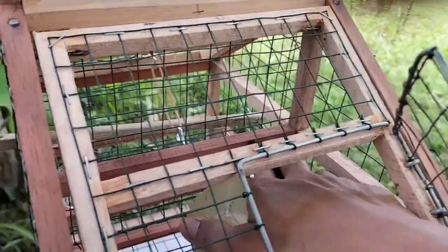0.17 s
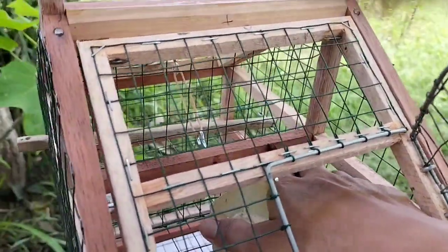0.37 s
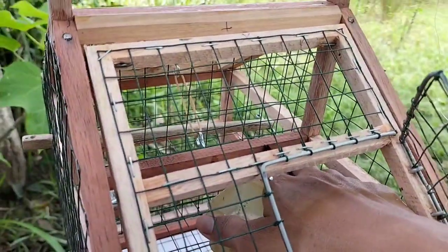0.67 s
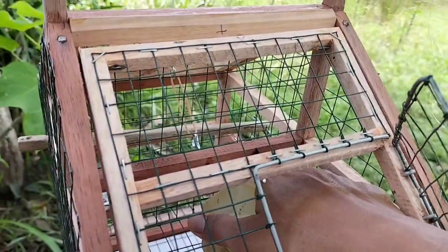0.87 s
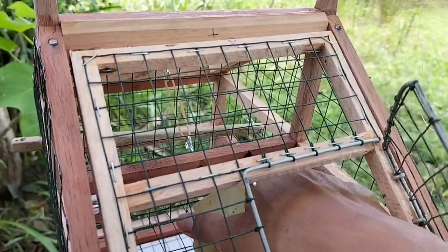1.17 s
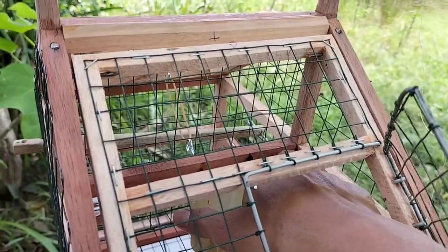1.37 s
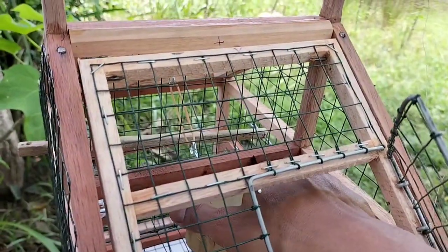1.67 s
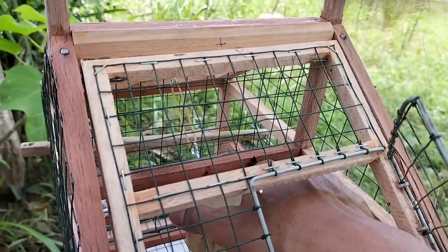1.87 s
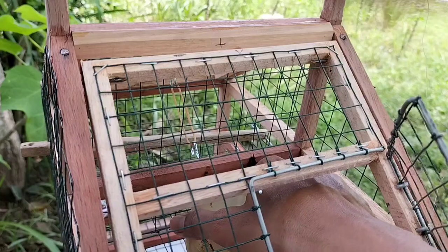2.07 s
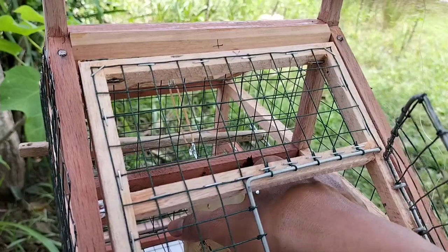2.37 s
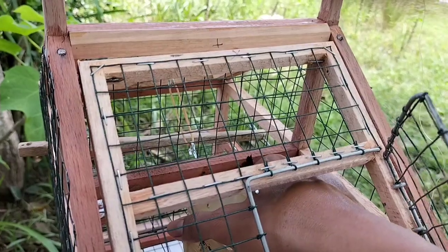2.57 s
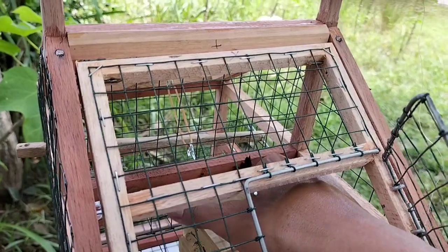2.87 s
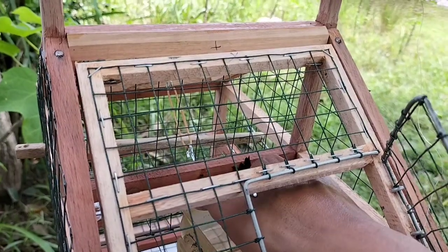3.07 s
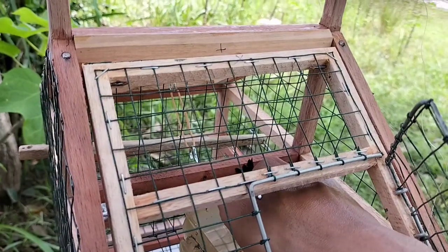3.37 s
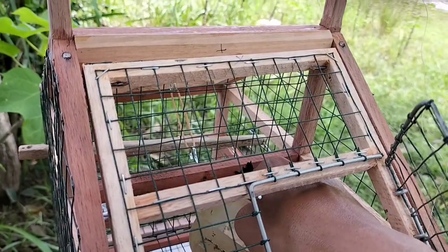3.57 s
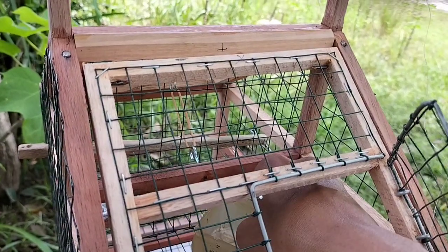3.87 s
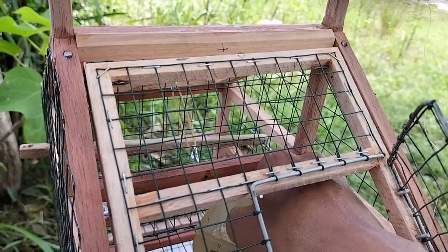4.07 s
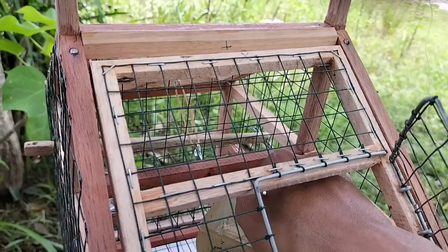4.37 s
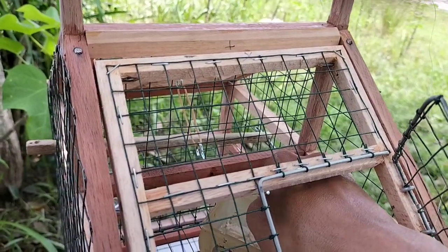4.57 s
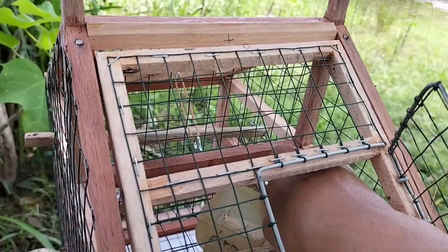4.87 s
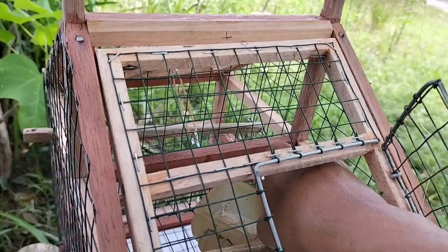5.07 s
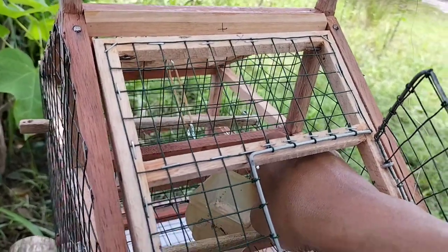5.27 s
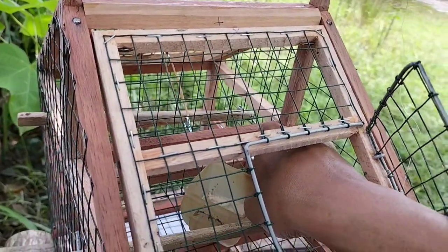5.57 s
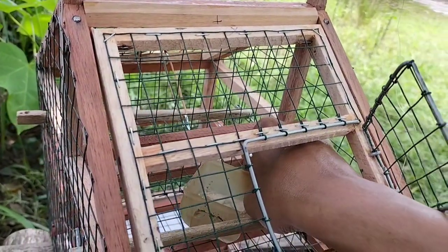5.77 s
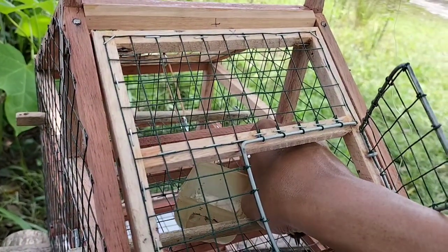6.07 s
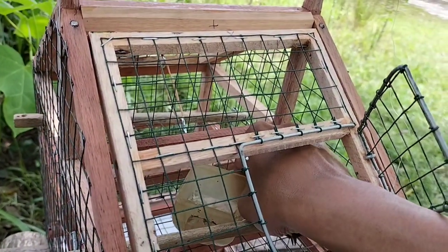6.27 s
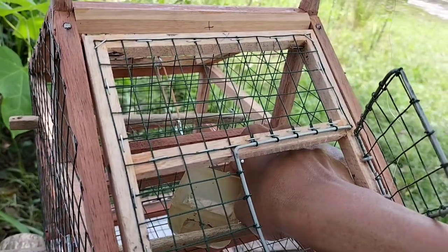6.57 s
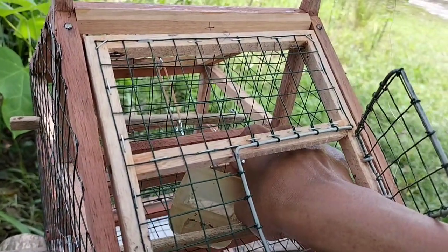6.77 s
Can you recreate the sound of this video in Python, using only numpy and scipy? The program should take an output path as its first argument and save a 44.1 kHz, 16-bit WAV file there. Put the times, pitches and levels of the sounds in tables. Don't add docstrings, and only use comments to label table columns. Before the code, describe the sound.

Close, nearly dry sound beside a wood and wire trap among trees. Faint hiss, thin insect bands and a low distant engine throb throughout. Four bright chirps come early, with thin far whistles afterwards. Soft feather rustles and wire ticks lead to a knock on the frame and a brief mesh ring. Three harsh bird screams follow, each breaking downward in pitch at its end.

```python
import sys
import numpy as np
from scipy import signal
from scipy.fft import rfft, irfft, next_fast_len
from scipy.io import wavfile
from scipy.ndimage import uniform_filter1d, map_coordinates

SR = 44100
rng = np.random.default_rng(int(sys.argv[2]) if len(sys.argv) > 2 else 0)


def int16_out(signal):
    q = np.round(np.clip(np.atleast_2d(signal).T, -1, 1) * 32767)
    wavfile.write(sys.argv[1], SR, q.astype(np.int16))


def invert_db(x):
    u = np.asarray(x, float) / 20
    return 10 ** u


N = 305172


def unit(x):
    return x / np.sqrt(np.mean(x ** 2) + 1e-20)


def along(points, hz):
    f, v = np.transpose(points)
    return np.interp(np.log(hz + 1), np.log(f + 1), v)


def curves(rows, start=0, count=N):
    s, *cols = np.transpose(rows)
    t = (start + np.arange(count)) / SR
    return [np.interp(t, s, c) for c in cols]


def wobble(rate, count=N):
    knots = rng.standard_normal(count // 20 + 8)
    return map_coordinates(knots, [np.arange(count) * rate / SR])


def filtered(x, gain):
    m = next_fast_len(len(x) + 4096)
    return irfft(rfft(x, m) * gain(np.fft.rfftfreq(m, 1 / SR)), m)[:len(x)]


def coloured(gain, count=N):
    return unit(filtered(rng.standard_normal(count), gain))


def tone(hz):
    return np.sin(2 * np.pi * np.cumsum(hz) / SR)


def add(x, s, part):
    i = round(s * SR)
    x[i:i + len(part)] += part[:len(x) - i]


def fade(count, edge_s):
    n = np.arange(count)
    return np.clip(np.minimum(n, count - n) / (edge_s * SR), 0, 1)


# f/Hz, t60/s
REVERBERATION = [(1000, 0.15), (4000, 0.74), (8000, 0.65)]


def trees(x, stretch):
    hz, t, z = signal.stft(rng.standard_normal(SR), SR, nperseg=256)
    t60 = stretch * along(REVERBERATION, hz)[:, None]
    tail = signal.istft(z * invert_db(-60 * t / t60), SR, nperseg=256)[1]
    delayed = np.pad(x, (150, 0))
    return signal.fftconvolve(delayed, tail / np.linalg.norm(tail))[:len(x)]


# f/Hz, density/dB
HISS_SPECTRUM = [(15, -34.5), (25, -11.5), (75, -11), (122, -6), (151, -4), (259, -10.5), (410, -19.5),
                 (1020, -17), (1270, -20), (1800, -28), (3920, -28), (4610, -34.5), (7080, -36.5),
                 (9020, -51), (15400, -59.5)]


def field_hiss():
    level_db = -72.5 - 0.36 * np.arange(N) / SR
    return invert_db(level_db + 6.5 + 0.89 * wobble(27.0)) * coloured(lambda f: invert_db(along(HISS_SPECTRUM, f)))


# f/Hz, width/Hz, level/dB
INSECT_BANDS = [(4050, 220, -88.5), (7200, 59, -95.5)]


def insects():
    x = np.zeros(N)
    for hz, width, db in INSECT_BANDS:
        band = coloured(lambda f: 1 / (1 + ((f - hz) / width) ** 2))
        x += invert_db(db + 2 * wobble(6)) * band
    return x


# order, level/dB
FIRING_ORDERS = [(2, -19.5), (4, -2), (5, 0.5), (6, -4.5), (8, -10.5), (9, -14), (10, -17.5), (12, -21.5)]
# t/s, level/dB
ENGINE_SWELL = [(0.0, -60), (0.44, -61), (1.17, -57.5), (1.46, -62.5), (1.56, -61), (2.68, -65),
                (2.76, -65), (3.1, -61.5), (3.68, -66.5), (3.8, -60), (4.07, -67.5), (4.15, -65.5),
                (4.55, -64.5), (4.66, -67), (5.0, -73), (5.43, -61), (5.82, -66), (6.92, -64)]


def engine():
    firing_hz = 30.07
    level_db, = curves(ENGINE_SWELL)
    shaft = 2 * np.pi * np.cumsum(firing_hz * (1 + 0.00596 * wobble(2.2))) / SR
    thud = np.zeros(N)
    for order, db in FIRING_ORDERS:
        thud += invert_db(db + 2.3 * wobble(4.17)) * np.sin(order * shaft + 0.76 * wobble(2.545))
    return invert_db(level_db - 1.0) * unit(thud)


# start t/s, length/s, from f/Hz, to f/Hz, level/dB
WHISTLE_GLIDES = [
    (1.662, 0.032, 6530, 5650, -69.5),
    (1.7, 0.026, 4660, 4050, -69),
    (1.736, 0.02, 4050, 3860, -72),
    (1.86, 0.24, 6650, 7200, -70.5),
    (1.975, 0.038, 7300, 7600, -67),
    (2.79, 0.038, 7230, 6460, -67.5),
    (2.804, 0.068, 7300, 6970, -82),
    (4.372, 0.026, 7430, 6780, -67.5),
    (4.435, .07, 7300, 6800, -90),
    (4.91, 0.042, 7200, 6530, -64),
]


def whistles():
    x = np.zeros(N)
    for s, length, from_hz, to_hz, db in WHISTLE_GLIDES:
        n = round(length * SR)
        hz = np.linspace(from_hz, to_hz, n) + 70 * wobble(120, count=n)
        add(x, s, invert_db(db + wobble(83, count=n)) * fade(n, 0.0074) * tone(hz))
    return x


# t/s, f/Hz, level/dB
CHIRP_SHAPE = [
    (0, 4100, -22),
    (.006, 3900, -32),
    (.012, 3950, -8),
    (.022, 4450, -17),
    (.035, 4940, 0.1),
    (.047, 5200, -14),
    (.057, 5560, -1),
    (.067, 5640, -26),
]
# t/s, level/dB, pitch factor
CHIRP_TIMES = [
    (0.582, -35.5, 1.024),
    (.692, -36, 1.005),
    (0.81, -34, 1.005),
    (.928, -33.5, 1.012),
]


def chirps():
    x, n = np.zeros(N), round(CHIRP_SHAPE[-1][0] * SR)
    hz, shape_db = curves(CHIRP_SHAPE, count=n)
    puff_swell = np.exp(-((np.arange(n) / SR - .012) / 0.0076) ** 2)
    for s, db, factor in CHIRP_TIMES:
        size = invert_db(db + uniform_filter1d(shape_db, size=130) + 1.7 * wobble(68, count=n))
        whistle = size * tone(factor * hz)
        puff = coloured(lambda f: np.exp(-((f - 6800) / 1300) ** 2), count=n)
        puff = invert_db(db - 34.5) * puff * puff_swell
        note = np.pad(fade(n, 0.00061) * (whistle + puff), (0, SR // 2))
        add(x, s, note + invert_db(-6) * trees(note, stretch=.35) + invert_db(-14) * trees(note, stretch=.8))
    return x


# f/Hz, density/dB
FEATHER_SPECTRUM = [(710, -35), (1200, 0), (2060, -25), (2340, 10), (3880, 2.5), (6580, -12.5), (7080, -6),
                    (9520, -22), (15000, -24)]
# t/s, peak level/dB, centre f/Hz, decay/s
TICK_TIMES = [(1.503, -57, 5500, 0.011), (1.573, -64, 7000, 0.0082), (2.0994, -61, 7300, 0.0074),
              (2.4274, -79, 5140, 0.006), (2.687, -60, 5840, 0.0084), (2.7374, -60, 5960, 0.0092),
              (2.8937, -57, 7000, 0.015), (3.0064, -63.5, 5010, 0.011), (3.6945, -59, 6750, 0.014),
              (3.7782, -56, 6200, 0.016), (4.029, -60, 7200, 0.007)]


def ticks():
    x, t = np.zeros(N), np.arange(SR // 20) / SR
    for s, db, hz, decay in TICK_TIMES:
        def contact(f):
            centred = 0.3 + 1 / (1 + ((f - hz) / 900) ** 2)
            return invert_db(along(FEATHER_SPECTRUM, f)) * centred / (1 + (3500 / (f + 1)) ** 4)
        burst = coloured(contact, count=len(t))
        add(x, s, invert_db(db - 3) * burst * (1 - np.exp(-t / .0008)) * np.exp(-t / decay))
    return x


# f/Hz, level/dB
FRICTION_BANDS = [(2600, -9), (3700, -5), (5300, -5), (6800, -6), (13200, -17)]
# start t/s, length/s, level/dB, centre f/Hz
STROKES = [(0.985, 0.144, -65, 3600), (1.005, 0.063, -57, 7200), (1.49, 0.17, -63.5, 5500),
           (1.602, 0.22, -71.5, 4760), (2.088, 0.177, -69.5, 4900), (2.404, 0.05, -64.5, 4870),
           (2.808, 0.32, -73.5, 4400), (3.327, 0.1, -70.5, 6540), (3.456, 0.55, -78, 2980),
           (3.63, 0.064, -55, 3000), (3.728, 0.21, -63, 5270), (4.639, 0.16, -67.5, 4770)]


def rustles():
    x = np.zeros(N)
    for s, length, db, hz in STROKES:
        n = round(length * SR)
        stroke = fade(n, .02) * invert_db(-10 * np.arange(n) / n)
        for band_hz, band_db in FRICTION_BANDS:
            near = invert_db(band_db) * (.5 + 1 / (1 + ((band_hz - hz) / 1500) ** 2))
            grains = coloured(lambda f: np.exp(-(np.log2((f + 1) / band_hz) / .2) ** 2), count=n)
            clumps_db = 3.6 * wobble(252.5, count=n) + 3.1 * wobble(42.6, count=n)
            add(x, s, invert_db(db - 5.5 + clumps_db) * stroke * near * grains)
    return x


# f/Hz, width/Hz, level/dB
FRAME_MODES = [(390, 49, -13.5), (411, 49, -12), (710, 37, -4.5), (744, 36, -1), (1000, 128, 2),
               (1270, 410, 2), (2300, 920, -1), (2750, 210, 11.5)]
# t/s, peak level/dB, hardness/dB per octave
BLOWS = [
    (0.936, -53, -16),
    (2.549, -75, -7),
    (3.64, -48.5, -14),
    (3.657, -37, -6),
    (3.67, -43, -11.5),
    (4.615, -63, -16),
    (6.87, -63, -26.5),
]


def knocks():
    x, t = np.zeros(N), np.arange(SR // 5) / SR
    for s, db, hardness_db in BLOWS:
        def frame(f):
            response = 0
            for k, (hz, width, level) in enumerate(FRAME_MODES):
                gain = (-1) ** k * invert_db(level + hardness_db * np.log2(hz / 1000))
                response = response + gain * 1j * f * width / (hz * hz - f * f + 1j * f * width)
            return response / (1 + 1j * f / 2600) ** 3
        blow = rng.standard_normal(len(t)) * invert_db(-60 * t / .028) * (1 - np.exp(-t / .0005))
        knock = filtered(blow, frame)
        add(x, s, invert_db(db) * knock / np.abs(knock).max())
    return x


# f/Hz, level/dB, time to fall by 90 dB/s
MESH_MODES = [(2420, -3, 0.12), (2733, 13, 0.08), (3850, 2.5, 0.081), (4660, -12, 0.06), (4830, -2, 0.096),
              (5500, 4, 0.04), (5860, 5, 0.033), (7840, -18, 0.04)]
# t/s, peak level/dB
MESH_RELEASE = [
    (4.6165, -41),
]


def snap():
    x, t = np.zeros(N), np.arange(SR // 4) / SR
    for s, db in MESH_RELEASE:
        ring = sum(invert_db(level - 5.0 - 90 * t / t60) * np.sin(2 * np.pi * hz * t)
                   for hz, level, t60 in MESH_MODES)
        crack = coloured(lambda f: 1 / (1 + (2500 / (f + 1)) ** 4) / (1 + (f / 8000) ** 8), count=len(t))
        crack = invert_db(-9 - 60 * t / .035) * crack
        add(x, s, invert_db(db) * (ring + crack) * (1 - np.exp(-t / .0004)))
    return x


# f/Hz, level/dB
LOWER_THROAT = [(1500, -17.5), (2300, -17.5), (3200, -6), (3800, 1.3), (4600, 2.2), (5200, 5), (6200, 0),
                (7100, -9)]
# f/Hz, level/dB
UPPER_THROAT = [(2940, -38), (5000, -16), (6270, -6), (7260, 0.5), (8360, -30.5), (9410, -51), (12000, -39),
                (15400, -33)]


def harmonics(glide, hz, phase, tone_db, second_db, open_db, bright):
    n = len(hz)
    lowest_db = -7 * np.clip(1 - 8 * bright, 0, 1)
    levels = [tone_db + along(LOWER_THROAT, k * glide) + db
              for k, db in ((1, lowest_db), (2, second_db), (3, open_db))]
    levels += [tone_db + 6 + open_db - 3 + along(UPPER_THROAT, k * hz) for k in range(4, 10)]
    unsettled = 1.3 * np.exp(-np.arange(n) / (.04 * SR)) * wobble(600, count=n)
    voice = np.zeros(n)
    for k, db in enumerate(levels):
        flicker = invert_db((1.5 + .4 * k) * wobble(140, count=n))
        shiver = (.03 * k * k + .04 * k) * wobble(500, count=n) + (k + 1) * unsettled
        voice += invert_db(db + 2.5) * flicker * np.sin((k + 1) * phase + shiver)
    return voice


def half_pitch_lines(phase):
    return sum(invert_db(db + 4.1 * wobble(37.5, count=len(phase))) * np.sin((k + .5) * phase)
               for k, db in enumerate([-12, 5, 7.5, -17.5]))


# f/Hz, density/dB
RASP_SPECTRUM = [(600, -40.5), (1000, -32.5), (1500, -24), (2000, -21), (2500, -10), (3100, -8.5),
                 (3700, -0.5), (4800, 2.1), (5900, -0.5), (7000, 3.5), (8400, -26.5), (9400, -60.5),
                 (11900, -26), (15400, -36)]
# f/Hz, width/Hz, level/dB
MOUTH_RESONANCES = [(3750, 150, 6), (4950, 120, 4), (5900, 150, 6)]


def chaotic_rasp(phase, bright):
    n = len(phase)
    beat = sum(invert_db(1.5 * wobble(60, count=n)) * tone(f * (1 + .1 * wobble(50, count=n)))
               for f in (300, 580, 870))
    skirts = np.zeros(n)
    for k in range(1, 9):
        noise = coloured(lambda f: .25 + 1 / (1 + (f / 400) ** 2), count=n)
        chaos = (.9 * beat + noise) * invert_db(2.5 * wobble(70, count=n))
        skirts += chaos * np.sin(k * phase + rng.uniform(0, 2 * np.pi))

    def tilted(tilt_db):
        return unit(filtered(skirts, lambda f: invert_db(along(RASP_SPECTRUM, f)
                                                   + tilt_db * np.log2(f / 5000 + .1))))

    def mouth(f):
        return invert_db(sum(db / (1 + ((f - hz) / width) ** 2) for hz, width, db in MOUTH_RESONANCES))

    share = np.clip(bright, 0, 1)
    mixed = (1 - share) * tilted(-6) + share * tilted(6)
    return filtered(mixed, mouth) * invert_db(1.4 * wobble(90, count=n))


# t/s, f/Hz
SCREAM_PITCH = [
    [(4.995, 1845), (5.04, 1974), (5.085, 1824), (5.145, 1851), (5.208, 1954), (5.3, 1891), (5.362, 1790),
     (5.42, 1650), (5.515, 1590)],
    [(5.692, 2300), (5.725, 2268), (5.785, 2380), (5.86, 2256), (5.965, 2174), (5.985, 2072), (6.075, 2040),
     (6.12, 1994), (6.172, 1902)],
    [(6.422, 2403), (6.505, 2310), (6.56, 2373), (6.61, 2386), (6.665, 2283), (6.75, 2169), (6.8, 2124),
     (6.835, 1961), (6.905, 1808)],
]
# t/s, effort level/dB, tone over rasp level/dB, beak opening/0-1
SCREAM_PUSH = [
    [(4.995, -47.5, 1.5, 0), (5.07, -42, 4, 0), (5.11, -38.5, 2, 0.39), (5.2, -33.5, 1, 0.63),
     (5.33, -32, -0.5, .5), (5.46, -37, 2.5, 0.63), (5.515, -36.5, 3.5, .5)],
    [(5.692, -39.5, -14, 0), (5.73, -41, 8.5, 0.02), (5.83, -37, 6, 0.76), (5.9, -36, 6.5, 0.55),
     (5.99, -36, 8, 0.6), (6.07, -36, 1.5, 0.72), (6.172, -33, 1.5, 0.4)],
    [(6.422, -49, 7, 0), (6.47, -40, -0.5, 0), (6.52, -44, 8, 0.35), (6.63, -43, 8, 0.48),
     (6.73, -39, 11.5, 0.35), (6.83, -39, 6, 0.61), (6.905, -37.5, 2.5, 0.16)],
]
# t/s, width/s, pitch jolt f/Hz, 2nd harmonic level/dB, higher harmonics level/dB
VOICE_CATCHES = [(5.097, .01, -70, -0.5, 8), (5.127, .012, -89, -3, 6.5), (5.233, 0.013, -80, 1.5, -0.5),
                 (5.352, .01, -61, -12, 6), (5.399, .012, -100, 1, 1.5), (5.792, 0.013, 6, 6.5, 7),
                 (5.836, .015, -100, 1, -12), (5.88, 0.0084, -40.5, -2.5, -4.5), (5.965, 0.015, 4, 2, -1),
                 (6.109, 0.024, -28, 11, -2), (6.561, 0.011, 5, 8.5, 1), (6.6, .007, 3.5, 5.5, -2),
                 (6.673, 0.0044, -19.5, -2, 2.5), (6.709, .018, -69.5, 3.5, 1), (6.86, .015, 11.5, 5.5, 7),
                 (6.777, 0.0088, -45.5, 4, 2)]


def screams():
    x = np.zeros(N)
    half_levels_db = [-70, -57.5, -55.5]
    for rows, pitch, half_db in zip(SCREAM_PUSH, SCREAM_PITCH, half_levels_db):
        start_s = rows[0][0]
        start, n = round(start_s * SR), round((rows[-1][0] - start_s) * SR)
        t = np.arange(n) / SR
        left = n / SR - t
        effort_db, tone_db, bright = curves(rows, start=start, count=n)
        effort_db = effort_db - 15 * np.clip(1 - t / 0.016, 0, 1) - 26.5 * np.clip(1 - left / .014, 0, 1)
        tone_db = tone_db + effort_db - 19 * np.clip(1 - t / 0.025, 0, 1)
        jolt_hz, second_db, higher_db = sum(
            np.outer(row[2:], np.exp(-((t + start_s - row[0]) / row[1]) ** 2)) for row in VOICE_CATCHES)
        ending = np.clip(1 - left / 0.044, 0, 1) ** 2
        crack_db = -15 * ending
        glide = (curves(pitch, start=start, count=n)[0] + jolt_hz) * (1 - .2 * ending)
        second_db = second_db + crack_db
        open_db = 31.5 * (bright - .6) + higher_db + crack_db / 2
        hz = glide * (1 + 0.00377 * wobble(100, count=n) + .005 * wobble(300, count=n))
        phase = 2 * np.pi * np.cumsum(hz) / SR
        voice = harmonics(glide, hz, phase, tone_db, second_db, open_db, bright)
        rasp = invert_db(effort_db) * chaotic_rasp(phase, bright)
        halves = invert_db(half_db - 27.5 * t) * half_pitch_lines(phase)
        add(x, start_s, fade(n, 0.0024) * (voice + rasp + halves))
    return x


def scene():
    background = field_hiss() + insects() + engine()
    far = whistles()
    far = far + invert_db(-0.5) * trees(far, stretch=.8)
    song = chirps()
    wood = knocks()
    trap = wood + snap() + invert_db(-4) * trees(wood, stretch=1.0)
    hand = ticks() + rustles()
    bird = screams()
    near = bird + invert_db(-14.5) * trees(bird, stretch=0.29) + invert_db(-46) * trees(bird, stretch=4.0)
    return np.tile(background + far + song + trap + hand + near, (2, 1))


def band_limit(x):
    return signal.sosfilt(signal.butter(12, 15600, fs=SR, output="sos"), x)


def record(dry):
    def port(f):
        notch = 1 - 0.33 * np.exp(-((f - 9600) / 800) ** 2)
        return notch / (1 + (36 / (f + 1)) ** 8) / (1 + (f / 15100) ** 40)
    mix = np.array([filtered(channel, port) for channel in dry])
    return band_limit(mix)


dry = scene()
out = record(dry)
int16_out(out)
```